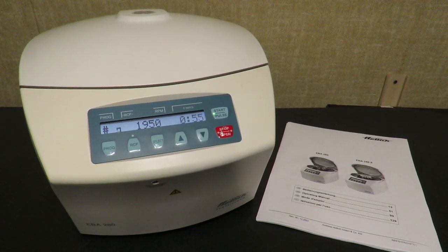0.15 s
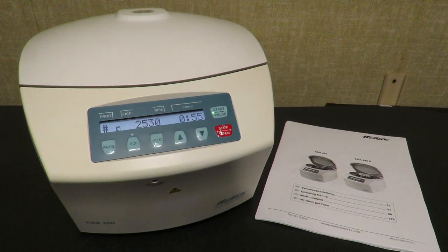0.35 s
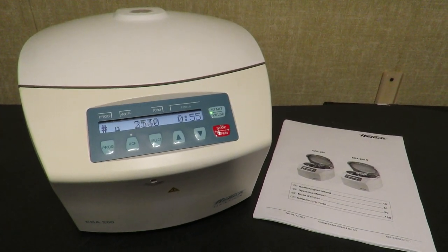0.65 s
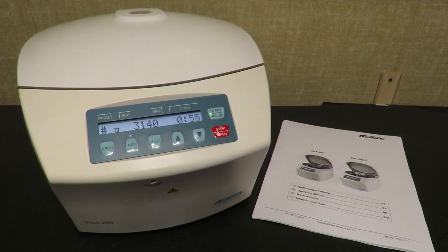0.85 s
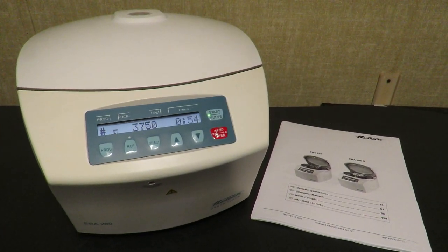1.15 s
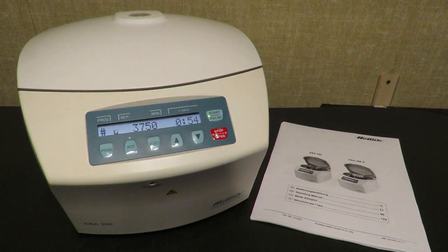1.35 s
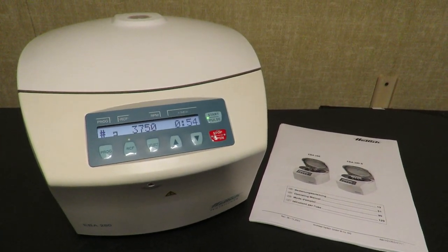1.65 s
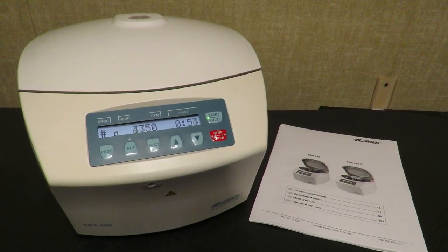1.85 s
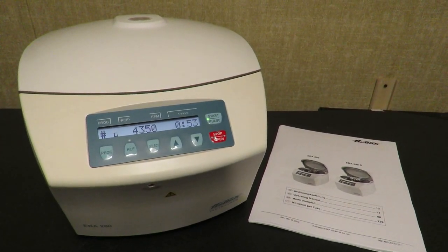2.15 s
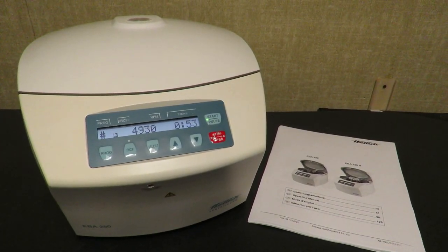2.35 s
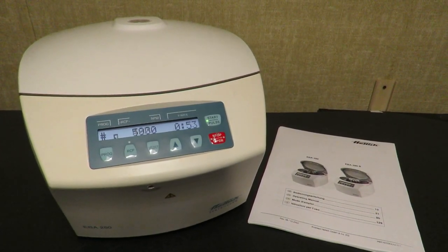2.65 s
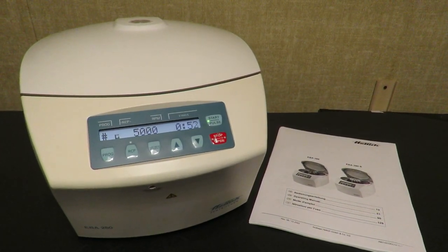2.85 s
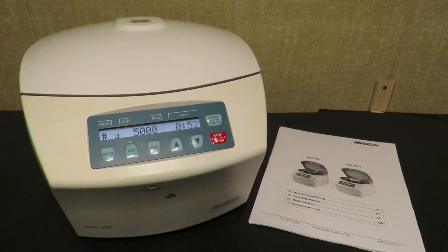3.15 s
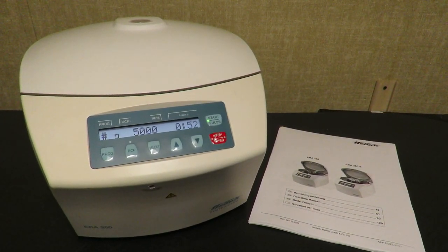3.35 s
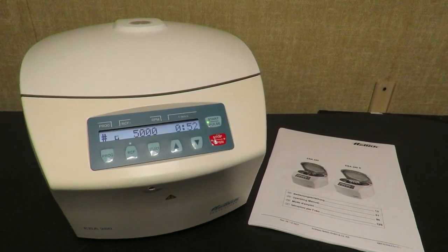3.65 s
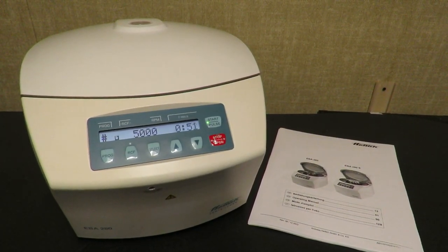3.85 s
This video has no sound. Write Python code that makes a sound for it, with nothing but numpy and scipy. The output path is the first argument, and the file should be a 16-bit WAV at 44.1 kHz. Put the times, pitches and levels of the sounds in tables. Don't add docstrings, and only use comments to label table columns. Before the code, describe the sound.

Close stereo microphones catch a benchtop centrifuge already turning; its motor hum climbs in pitch, rotor wind booms louder inside the closed bowl, a brief low shudder passes, then pitch settles at full speed indoors.

```python
import sys
import numpy as np
from scipy import signal
from scipy.fft import rfft, irfft
from scipy.io import wavfile

SR = 44100
rng = np.random.default_rng(int(sys.argv[2]) if len(sys.argv) > 2 else 0)


def attenuation_scalar(level_db):
    decades = np.asarray(level_db, float) / 20
    return 10 ** decades


def unload_wav(signal):
    wavfile.write(
        sys.argv[1],
        SR,
        np.round(np.clip(np.atleast_2d(signal).T, -1, 1) * 32767).astype(np.int16),
    )


N = 176400
TOP_HZ = 83.07


def speed():
    start_hz, run_up_hz_per_s, knee_hz = 42.7, 19.4, 0.6
    below = TOP_HZ - start_hz - run_up_hz_per_s * np.arange(N) / SR
    return TOP_HZ - knee_hz * np.logaddexp(0, below / knee_hz)


def drift(rate_hz):
    pole = np.exp(-80 * np.pi * rate_hz / SR)
    settle = 2000
    slow = signal.lfilter([1], [1, -2 * pole, pole * pole], rng.standard_normal(N // 40 + settle + 2))[settle:]
    return np.interp(np.arange(N) / 40, np.arange(len(slow)), slow / slow.std())


def swell(centre_s, length_s):
    return np.exp(-((np.arange(N) / SR - centre_s) / length_s) ** 2)


def colour(points, hz):
    point_hz, point_db = np.transpose(points)
    return attenuation_scalar(np.interp(np.log(hz), np.log(point_hz), point_db, left=-120, right=-120))


def peaks(table, hz):
    return np.sqrt(sum(attenuation_scalar(2 * db) / (1 + ((hz - f) / w * 1.3) ** 2) ** 2 for f, w, db in table))


def ripple():
    depth_db, spacing_hz = 2.2, 22
    knots_hz = np.arange(0, SR / 2 + spacing_hz, spacing_hz)
    fade_in = np.clip(knots_hz / 1600 - 0.5, 0, 1)
    gain_db = depth_db * rng.standard_normal(len(knots_hz)) * fade_in
    return lambda hz: attenuation_scalar(np.interp(hz, knots_hz, gain_db))


def noise(gain):
    # hz, level_db
    spread = [(60, -18), (150, -28.5), (236, -20), (450, -17), (560, -27), (1200, -36), (2700, -22),
              (6000, -21)]
    # hz, share
    lean = [(60, .001), (170, .005), (240, .08), (450, .03), (800, .001)]
    hz = np.maximum(np.arange(N // 2 + 1) * SR / N, 1)
    mid, side = rfft(rng.standard_normal((2, N))) * gain(hz)
    spread_hz, spread_db = np.transpose(spread)
    side = side * attenuation_scalar(np.interp(np.log(hz), np.log(spread_hz), spread_db))
    side = side + mid * np.interp(hz, *np.transpose(lean))
    mid, side = irfft(mid, N), irfft(side, N)
    return np.array([mid + side, mid - side]) / mid.std()


def brighten(body, from_hz, power, rps):
    upper = signal.sosfiltfilt(signal.butter(2, from_hz, "high", fs=SR, output="sos"), body)
    return body + upper * ((rps / TOP_HZ) ** power - 1)


def tones(multiples, rows, rps, radiate=lambda hz: 1, waver_db=2.5, waver_hz=3):
    out = 0
    turns = np.cumsum(rps) / SR
    for times, (db, power, pan_db) in zip(multiples, rows):
        level = attenuation_scalar(db + waver_db * drift(waver_hz)) * (rps / TOP_HZ) ** power * radiate(times * rps)
        wave = np.sqrt(2) * level * np.sin(2 * np.pi * (times * turns + rng.random()))
        out = out + wave * attenuation_scalar(np.array([[pan_db / 2], [-pan_db / 2]]))
    return out


def steady_tones(table):
    return tones([hz for hz, db in table], [(db, 0, 0) for hz, db in table], np.ones(N))


def boom(rps):
    # time_s, level_db
    boom_level = [
        (0.0, -45),
        (0.03, -38),
        (1.94, -23),
        (1.97, -24.5),
        (2.91, -22),
        (2.94, -23.5),
        (3.5, -22),
        (3.54, -27),
        (3.65, -20),
        (4.0, -25),
    ]
    # hz, width_hz, level_db
    bowl = [(108, 14, -28), (140.7, 12.5, 1.5), (165.2, 23, -3), (197.7, 34, -3), (237.3, 11.7, -2),
            (263, 17, -7.5), (291, 9.7, -11), (331, 67, -22)]
    low_cut_hz = 69
    body = noise(lambda hz: peaks(bowl, hz) / np.hypot(1, (low_cut_hz / hz) ** 3))
    body = brighten(body, 170, 0.83, rps)
    boom_level_s, boom_level_db = np.transpose(boom_level)
    return attenuation_scalar(np.interp(np.arange(N) / SR, boom_level_s, boom_level_db) + 0.44 * drift(5.0)) * body


def bowl_tone(rps):
    # hz, width_hz, level_db
    driven = [(131, 12, -41.5), (152, 12.8, -27)]
    return tones([2], [(0, 0, 0)], rps, lambda hz: peaks(driven, hz))


def roar(rps, fine):
    # hz, width_hz, level_db
    housing = [(368.6, 19.6, -1), (433.3, 15.7, 2), (463, 57, -1.5), (530, 120, -8), (718, 52, -3),
               (848, 90, -10), (1073, 80, -13.5), (1182, 31, -3), (1268, 85, -7.5), (1558, 31, -5),
               (1690, 32, -13.5), (1865, 36, -15.5), (2064, 87, -21.5), (2350, 87, -26.5)]
    # hz, level_db
    bed = [(300, -16), (600, -22.5), (1000, -17), (2000, -26), (4000, -32.5), (8000, -50)]
    body = noise(lambda hz: fine(hz) * np.hypot(peaks(housing, hz), colour(bed, hz)))
    return attenuation_scalar(-30 + 0.54 * drift(24)) * (rps / TOP_HZ) ** 3.21 * body


def tubes(rps):
    tube_times = [8, 16]
    # level_db at full speed, speed_power, left_right_db
    tube_rows = [(-38.2, 0, 2.2), (-62, 2.5, .1)]
    # hz, width_hz, level_db
    lid = [(650, 42, .3), (1250, 200, 0)]
    return tones(tube_times, tube_rows, rps, lambda hz: peaks(lid, hz), waver_db=0.6)


def frame_orders(rps):
    order_times = [24, 25, 28, 32, 34, 37, 40, 44, 48, 95]
    # level_db at full speed, speed_power, left_right_db
    order_rows = [(-59, 0, .1), (-60, .1, .1), (-63, 1, .1), (-66, 2, .1), (-59, 1.5, .1), (-59, 1.5, .1),
                  (-67, .1, .1), (-64, .1, .1), (-57.5, .1, .1), (-72, .1, .1)]
    # hz, width_hz, level_db
    bands = [(1840, 60, 1), (2070, 120, 2), (2200, 70, 1), (2275, 60, 2), (3020, 150, -15),
             (4000, 200, -14), (6750, 150, 1)]
    return tones(order_times, order_rows, rps, lambda hz: peaks(bands, hz), waver_db=3.0, waver_hz=14)


def cogging(rps):
    # hz, width_hz, level_db
    passed = [(1378, 24, -46), (1420, 22, -54)]
    return tones([24], [(0.0021, 0.0034, 0.0032)], rps, lambda hz: peaks(passed, hz), waver_db=0.83)


def hiss(rps, fine):
    # hz, level_db
    hiss_colour = [(800, -8.5), (1500, -7), (2230, -9.5), (2900, -16), (5850, -24.5), (8000, -25.5),
                   (8700, -32), (10500, -40.5), (14000, -48), (16000, -72)]
    # hz, width_hz, level_db
    frame = [(2145, 120, 5.5), (2950, 65, 7.5), (3840, 63, 1.5), (4240, 310, 3.5), (4670, 200, 6.5),
             (5070, 100, 6), (5340, 150, 6.5), (6240, 220, 6), (6860, 200, 6), (7450, 130, 3),
             (7700, 150, -0.5)]
    body = noise(lambda hz: fine(hz) * colour(hiss_colour, hz) * np.hypot(1, peaks(frame, hz)))
    strain_db = 1.2 * swell(2.08, 0.25)
    return attenuation_scalar(-47.5 + 0.4 * drift(7.4) + strain_db) * (rps / TOP_HZ) * body


def whine(rps):
    # hz, level_db
    balls = [(4086, -66), (4221, -70), (4307, -70), (4457, -71), (4560, -70), (4667, -71), (4797, -71),
             (5238, -75), (6245, -77), (6498, -76), (7009, -78), (7149, -80), (7456, -78), (7795, -74),
             (7827, -75), (7860, -72)]
    trim_db, speed_power = -1.5, 4.0
    rows = [(db + trim_db, speed_power, rng.normal(0, 2)) for hz, db in balls]
    return tones([hz / TOP_HZ for hz, db in balls], rows, rps)


def winding(rps):
    return swell(2.04, 0.06) * tones([81.6], [(-64, 0, 0)], rps)


def shudder():
    centre_hz, width_hz = 103, 10
    return attenuation_scalar(-41.5) * swell(0.85, 0.2) * noise(lambda hz: peaks([(centre_hz, width_hz, 0)], hz))


def unbalance(rps):
    # hz, width_hz, level_db
    mounts = [(48, 5, -64), (60, 14, -58)]
    return tones([1], [(0, 0, 0.0031)], rps, lambda hz: peaks(mounts, hz), waver_db=0.84)


def drive():
    # hz, level_db
    electronics = [(540, -58), (2595, -73), (3031, -74)]
    return steady_tones(electronics)


def rumble(rps):
    # hz, level_db
    low_colour = [(15, -43.5), (30, -29.5), (52, -7), (62, -18), (85, -6.5), (110, 6), (140, -18.5),
                  (250, -83.5)]
    return attenuation_scalar(-53) * (rps / TOP_HZ) ** 0.93 * noise(lambda hz: colour(low_colour, hz))


def walls(rps):
    # hz, level_db
    wall_colour = [(200, -10.5), (320, 5.5), (600, -1.5), (1260, -9), (5500, -23.5), (9500, -27),
                   (11500, -30.5), (14500, -41.5), (16000, -72)]
    body = noise(lambda hz: colour(wall_colour, hz)).mean(axis=0)
    body = brighten(body, 8500, 0.7, rps)
    return attenuation_scalar(-48.5) * (rps / TOP_HZ) ** 0.69 * body * [[1], [-1]]


def preamp_hiss():
    # hz, level_db
    amplifier = [(9000, -17.5), (11500, 1.5), (14200, -10), (14600, -11), (16000, -21)]
    hz = np.maximum(np.arange(N // 2 + 1) * SR / N, 1)
    body = irfft(rfft(rng.standard_normal(N)) * colour(amplifier, hz), N)
    return attenuation_scalar(-85) * body / body.std()


def pilot():
    return tones([15725], [(-102.5, 0, 0)], np.ones(N), waver_db=3.0)


def scene():
    rps, fine = speed(), ripple()
    air = boom(rps) + bowl_tone(rps) + roar(rps, fine) + tubes(rps)
    motor = frame_orders(rps) + cogging(rps) + hiss(rps, fine) + whine(rps) + winding(rps) + drive()
    return air + motor + shudder() + unbalance(rps) + rumble(rps) + walls(rps)


def roll_off(x):
    return signal.sosfilt(signal.butter(12, 15800, fs=SR, output="sos"), x)


def record(dry):
    return roll_off(dry + pilot() + preamp_hiss())


dry = scene()
out = record(dry)
unload_wav(out)
```